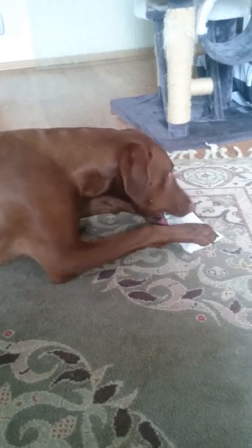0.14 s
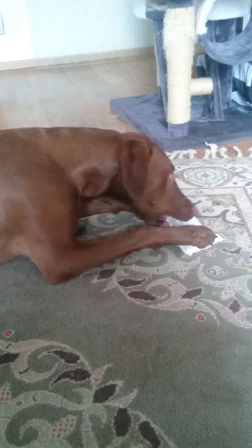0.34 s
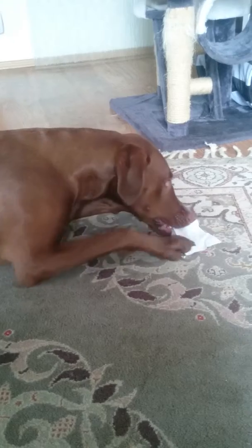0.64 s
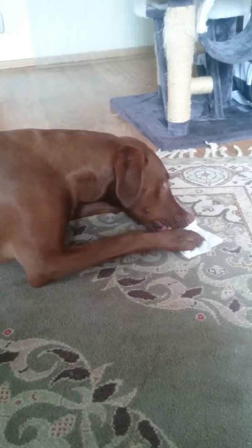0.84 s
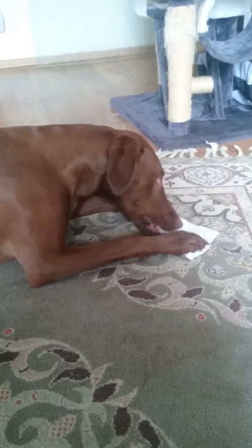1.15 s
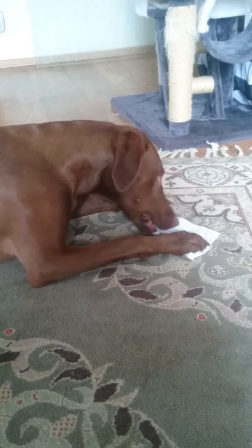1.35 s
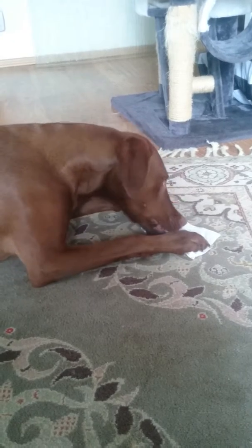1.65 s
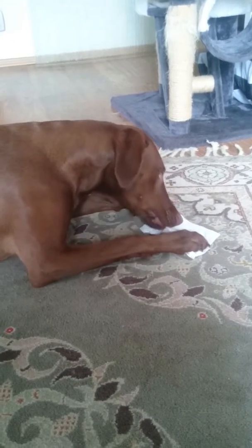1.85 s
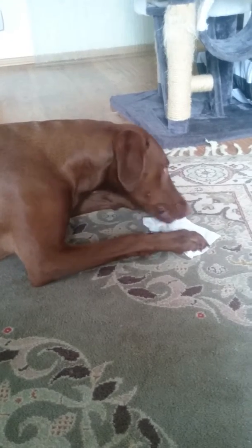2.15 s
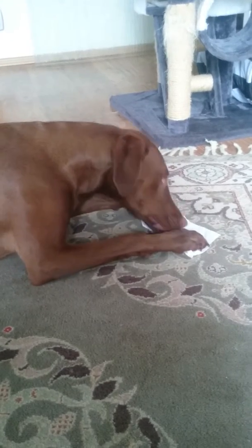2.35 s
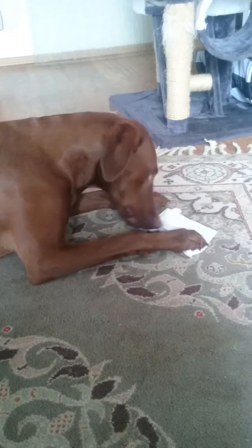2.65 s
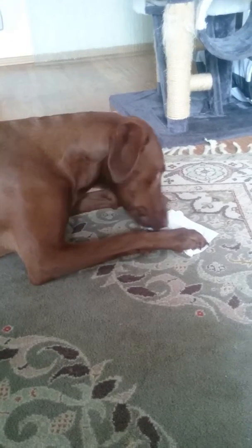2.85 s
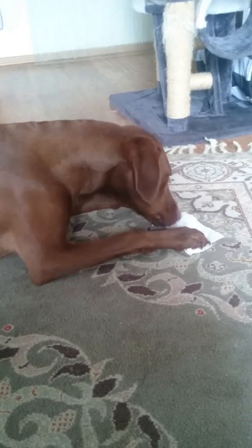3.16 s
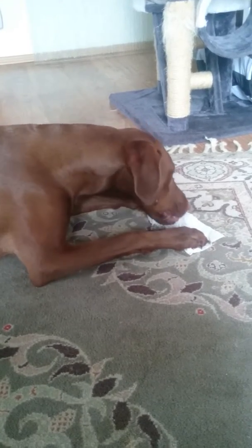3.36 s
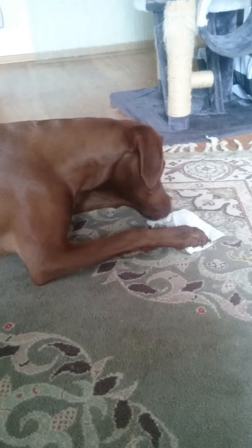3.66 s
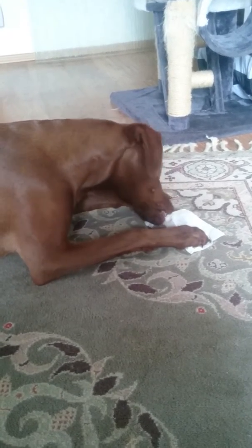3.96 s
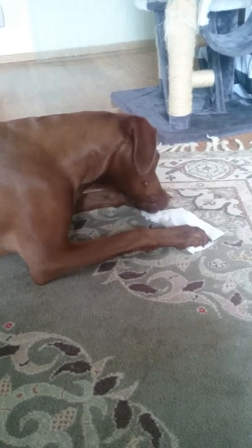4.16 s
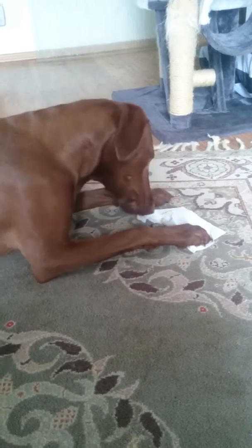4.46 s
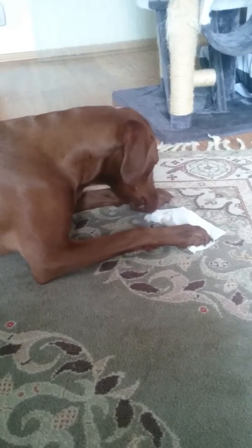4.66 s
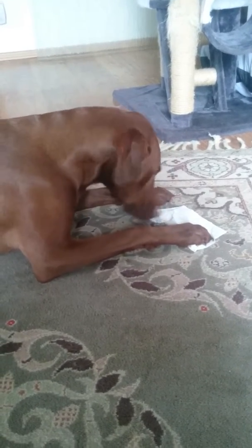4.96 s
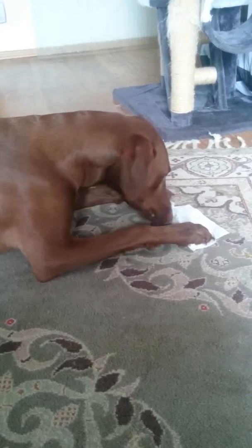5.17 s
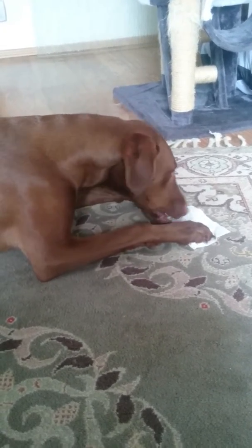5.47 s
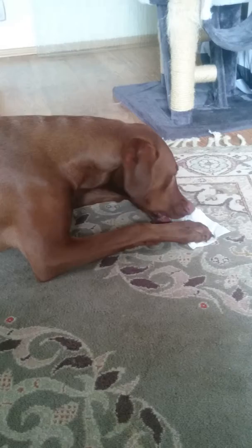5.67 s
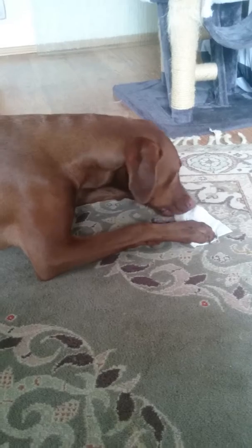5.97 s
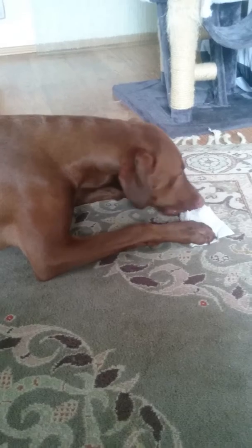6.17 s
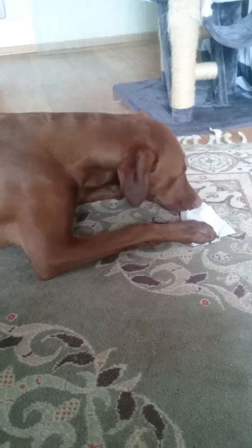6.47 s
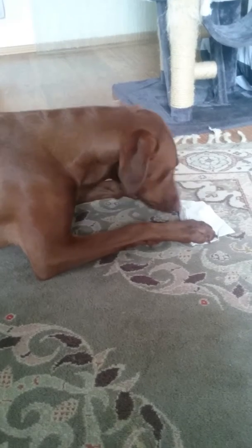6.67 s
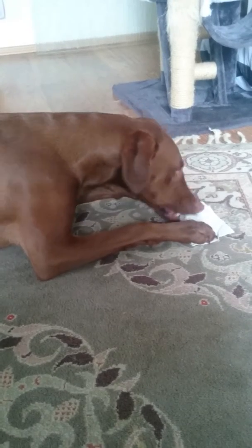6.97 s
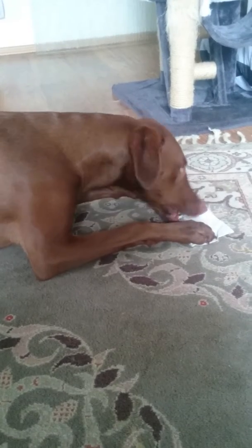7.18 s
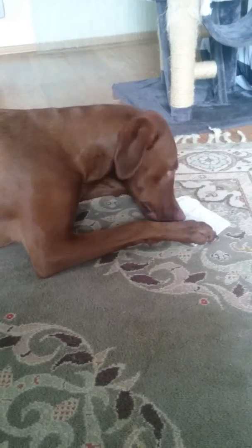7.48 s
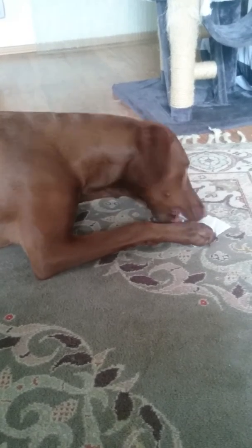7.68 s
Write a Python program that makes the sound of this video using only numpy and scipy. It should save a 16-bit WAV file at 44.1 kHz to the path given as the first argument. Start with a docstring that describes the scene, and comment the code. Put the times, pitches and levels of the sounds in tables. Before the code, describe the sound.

A dog chews and tears a paper packet on a carpet, with sharp irregular crackles, wet jaw smacks and a low grumble near the end.

```python
"""Paper cracks sharply at once: a dog on a carpet chews and tears a packet a step away from a phone,
in a small furnished room. Creases are enveloped noise ringing patches of the sheet, singly or in swarms.
Jaw smacks are decaying sines; near the end a low grumble drives throat and chest resonances with pulses.
Room tone lies under all; the two microphone ports ring at different pitches, wired in opposite sense.
"""
import sys
import numpy as np
from scipy import signal
from scipy.fft import rfft, irfft
from scipy.io import wavfile
from scipy.ndimage import uniform_filter1d

SR = 44100
rng = np.random.default_rng(int(sys.argv[2]) if len(sys.argv) > 2 else 0)


def rack_gain(trim_db):
    """Turn a fader trim in dB into the linear factor to multiply a signal by."""
    fader = np.asarray(trim_db, float)
    return 10 ** (fader / 20)


def log_audio(samples):
    """Write samples as a 16-bit WAV file to the path given in sys.argv[1]."""
    # one column per channel
    frames = np.atleast_2d(samples).T
    # limit to full scale, then quantise
    limited = np.clip(frames, -1, 1)
    pcm = np.round(limited * 32767).astype(np.int16)
    wavfile.write(sys.argv[1], SR, pcm)


N = 345744


def read(table, hz):
    """Interpolates a (f/Hz, value) table on a log-frequency axis."""
    f, v = np.transpose(table)
    return np.interp(np.log(np.maximum(hz, 1)), np.log(f), v)


def tinted(table, channels):
    """Steady noise whose power per Hz follows the table."""
    hz = np.fft.rfftfreq(N, 1 / SR)
    white = rng.standard_normal((channels, N))
    return irfft(rfft(white) * rack_gain(read(table, hz)) * np.sqrt(SR / 2), N)


def causal(table, size=1024):
    """Minimum-phase response with the table's colour, from the folded cepstrum."""
    hz = np.fft.rfftfreq(size, 1 / SR)
    cepstrum = irfft(np.log(rack_gain(read(table, hz))), size)
    cepstrum[1:size // 2] *= 2
    cepstrum[size // 2 + 1:] = 0
    return irfft(np.exp(rfft(cepstrum)), size)[:size // 2]


def ring(x, hz, width_hz):
    """One resonance, gain 1 at the centre."""
    return signal.lfilter(*signal.iirpeak(hz, hz / width_hz, SR), x)


def bursts(times_s, gains, decay_s):
    """Envelope that jumps at each time and decays exponentially."""
    kicks = np.zeros(N)
    np.add.at(kicks, np.clip((times_s * SR).astype(int), 0, N - 1), gains)
    return signal.lfilter([1], [1, -np.exp(-1 / (decay_s * SR))], kicks)


def scattered(alike):
    """Noise for two ports: creases lie all over the sheet, so the ports get them only partly alike."""
    noise = rng.standard_normal((3, N))
    share = np.clip(alike, 0, 1)
    return np.sqrt(share) * noise[0] + np.sqrt(1 - share) * noise[1:]


# low / body / bright band edges of the paper sound: f/Hz
PAPER_EDGES_HZ = [750, 2300, 7000, 16500]
# resonances of the folded packet: f/Hz, width/Hz, level/dB
PACKET_MODES = [(824, 13.7, 1.5), (1020, 10, -61), (1274, 21, -5)]


def part(x, k, thud_db=-19):
    """Band k of white noise (0 low, 1 body, 2 bright) at unit power; low adds packet rings and a thud."""
    lo, hi = PAPER_EDGES_HZ[k:k + 2]
    band = signal.butter(3, [lo, hi], "band", fs=SR, output="sos")
    y = signal.sosfilt(band, x) * np.sqrt(SR / 2 / (hi - lo))
    if k == 0:
        y = y + sum(rack_gain(db) * ring(y, hz, width_hz) for hz, width_hz, db in PACKET_MODES)
        y = y + rack_gain(thud_db) * ring(x, 438, 270) * np.sqrt(SR / 600)
    return y


# bites and tugs: t/s at height, body level/dB, rise/s and fall/s per 20 dB, bright re body/dB
BITES = [(0.0, -23, .01, 0.055, 0), (0.05, -35, 0.046, 0.14, -3.5), (0.22, -43.5, 0.1, 0.21, -6),
         (0.52, -35.5, 0.18, 0.32, -3.5), (0.589, -34, 0.12, 0.026, -7), (0.76, -41, 0.037, 0.036, -5),
         (0.872, -34, 0.025, 0.085, -6), (0.96, -45, 0.038, 1, -9), (1.11, -44.5, 0.36, 0.042, -5),
         (1.18, -44, 0.072, 0.071, -2.5), (1.24, -45, 0.069, 0.092, -4), (1.29, -44, .04, 0.053, -11.5),
         (1.639, -35.5, 0.053, 0.023, -9), (1.83, -45, 0.44, 0.39, -4.5), (1.988, -38.5, 0.013, 0.14, -15),
         (2.048, -32.5, .03, 0.079, -4), (2.08, -42, .05, 0.14, -5), (2.25, -43.5, 0.068, 0.04, -4.5),
         (2.33, -48, 0.04, 0.18, -14), (2.4, -42, 0.18, 0.35, -7.5), (2.57, -36.5, 0.061, .12, 3),
         (2.619, -30, 0.096, 0.12, -2.5), (2.7, -40.5, 0.12, 0.1, -21), (2.93, -47, 0.058, 0.13, -7),
         (3.05, -43, 0.032, 0.18, -2.5), (3.12, -38.5, 0.089, 0.15, -23), (3.23, -44, 0.078, 0.071, -4.5),
         (3.57, -51, .1, 0.21, -0.5), (3.73, -55, 0.09, 0.091, -9), (3.89, -55, 0.06, .05, -18),
         (3.95, -49.5, 0.031, 0.45, -27), (4.06, -51.5, 0.13, .6, 3.5), (4.21, -41.5, 0.35, 0.091, -7),
         (4.65, -55, .02, 0.093, -4), (4.74, -53.5, 0.073, 0.1, -8), (4.889, -47.5, 0.042, 0.026, -14),
         (4.981, -44, 0.059, 0.094, -7.5), (5.152, -42, 0.021, 0.085, -7.5), (5.37, -49.5, 0.12, 0.045, -6),
         (5.521, -43, 0.048, .13, -12), (5.57, -50, 0.16, 0.071, -0.5), (5.9, -48, 0.12, 0.043, -4),
         (6.088, -42, .22, 0.065, -7.5), (6.329, -38, 0.019, 0.049, -17), (6.44, -48, 0.12, 0.053, -7),
         (6.6, -53, 0.051, .11, -2.5), (6.97, -52, 0.048, .1, -1), (7.01, -39, 0.039, 0.03, -9.5),
         (7.18, -49, 0.013, 0.23, -2), (7.23, -42.5, 0.085, 0.066, -12), (7.31, -42, 0.074, 0.37, -7.5),
         (7.419, -39, 0.11, 0.056, -5), (7.51, -59, 0.11, 0.079, -3), (7.69, -46.5, 0.079, .12, -5),
         (7.751, -41, 0.027, 0.12, -8)]
# faint rustle between bites: t/s, body level/dB, low level/dB while the summed body is at -45 dB
BETWEEN = [(0, -54, -56), (.8, -58.5, -54.5), (1.45, -81, -57.5), (2.2, -78, -54), (2.87, -55.5, -55.5),
           (3.35, -53.5, -58.5), (3.5, -60.5, -63.5), (3.85, -82, -56), (4.3, -66, -63),
           (4.898, -74, -67.5), (5.4, -60, -64.5), (5.75, -58.5, -60), (6.3, -57, -58), (6.8, -60, -59.5),
           (7.2, -57, -56.5), (7.58, -66, -58.5), (7.84, -83, -52)]
LOW_DB_PER_BODY_DB, BETWEEN_BRIGHT_RE_BODY_DB = 0.73, -7.5


def effort():
    """Body, low and bright levels in dB: bites rise and fall over the faint rustle, summed in power."""
    t = np.arange(0, N + 64, 64) / SR
    s, db, rise_s, fall_s, bright_db = np.transpose(BITES)[:, :, None]
    drop_db = 20 * np.where(t < s, (s - t) / rise_s, (t - s) / fall_s)
    bite_power = rack_gain(db - drop_db) ** 2
    at, rest_db, low_db = np.transpose(BETWEEN)
    rest_power = rack_gain(np.interp(t, at, rest_db)) ** 2
    body = 10 * np.log10(bite_power.sum(0) + rest_power)
    bite_bright = (bite_power * rack_gain(bright_db) ** 2).sum(0)
    bright = 10 * np.log10(bite_bright + rest_power * rack_gain(BETWEEN_BRIGHT_RE_BODY_DB) ** 2)
    low = np.interp(t, at, low_db) + LOW_DB_PER_BODY_DB * (body + 45)
    return t, body, low, bright


# patches of the sheet that the small creases ring: f/Hz
PATCHES_HZ = [3020, 3640, 4600, 5920, 7920]
CREASE_MOST_DB = 7


def rustle(bright_rub=0.1, per_s=1100., scatter_db=0.5, decay_s=(.0015, .0009, .0004), rub=0.66,
           alike=0.54, sharpness=7.2):
    """Random tiny creases over soft rubbing; each rings one patch, with its own low and bright share."""
    s, body, low, bright = effort()
    t = np.arange(N) / SR
    chance = rng.random((12000, 5))
    times = np.cumsum(-np.log(chance[:, 0])) / per_s
    inside = times < N / SR
    chance, times = chance[inside], times[inside]
    size_db = np.minimum(-scatter_db * np.log(chance[:, 1]), CREASE_MOST_DB)
    patch = (chance[:, 3] * len(PATCHES_HZ)).astype(int)
    noise = scattered(alike)

    envs = []
    for j in range(len(PATCHES_HZ)):
        mine = patch == j
        envs.append(bursts(times[mine], rack_gain(size_db[mine]), decay_s[1]))
    # level over 1/8 s is evened out, so effort() alone sets it
    loudness = np.sqrt(uniform_filter1d(sum(envs) ** 2, SR // 8))
    rung = sum(ring(env / loudness * noise, hz, hz / sharpness) for env, hz in zip(envs, PATCHES_HZ))
    out = part(rack_gain(np.interp(t, s, body)) * (np.sqrt(sharpness) * rung + rub * noise), 1)

    for k, db, rubbing in ((0, low, rub), (2, bright, bright_rub)):
        env = bursts(times, rack_gain(size_db + 7.6 * chance[:, 2 + k]), decay_s[k])
        env = env / np.sqrt(uniform_filter1d(env ** 2, SR // 8)) + rubbing
        out = out + part(env * rack_gain(np.interp(t, s, db)) * noise, k)
    return out


# room tone: f/Hz, level/(dB per Hz)
ROOM_TONE = [(25, -108), (55, -92.5), (110, -95.5), (210, -98), (400, -108), (800, -106), (2500, -106),
             (8000, -112)]


def room_tone(shared=0.57):
    """Steady low-weighted noise; both ports share this part of its power."""
    tone = tinted(ROOM_TONE, channels=3)
    return np.sqrt(shared) * tone[0] + np.sqrt(1 - shared) * tone[1:]


STRAY_PER_S, STRAY_OVER_DB, STRAY_SCATTER_DB = 90, 2, 7


def strays():
    """Lesser creases at random moments, a little above the swarm around them; rows like SNAPS."""
    t, body, _, bright = effort()
    chance = rng.random((1000, 4))
    s = np.cumsum(-np.log(chance[:, 0])) / STRAY_PER_S
    level_db = np.interp(s, t, body) + STRAY_OVER_DB + STRAY_SCATTER_DB * chance[:, 1] ** 2
    patch_hz = 3000 * 2 ** chance[:, 2]
    bright_db = np.interp(s, t, bright - body) + 11 * chance[:, 3] - 4
    return np.transpose([s, level_db, patch_hz, bright_db])[s < N / SR]


# clearest single creases: t/s, level/dB, patch f/Hz, bright re level/dB
SNAPS = [(0.0102, -14.5, 4600, 2), (0.1834, -31, 4530, 2), (0.2106, -29.5, 2900, -18),
         (0.3104, -36, 4900, 2), (0.407, -27.5, 4970, 0), (0.4273, -28.5, 3400, -16),
         (0.474, -30, 4150, -11), (0.5367, -31.5, 3760, 17.5), (0.559, -21, 4600, -3),
         (0.5814, -18, 4630, -2), (0.751, -29.5, 4100, -17), (0.8753, -26.5, 3980, 2),
         (0.8814, -26, 5930, 1), (0.959, -30, 4600, 5.5), (1.0013, -30, 4040, 4.5), (1.0913, -38, 3320, 1),
         (1.1137, -30.5, 4770, -19), (1.16, -30.5, 3300, -12), (1.1704, -30, 2800, -17),
         (1.2457, -26.5, 3840, -3), (1.283, -36, 4300, 10), (1.4552, -43.5, 3200, 13),
         (1.599, -33.5, 2900, 7.5), (1.6247, -30.5, 3320, -20), (1.6385, -32.5, 4700, -10),
         (1.739, -34, 2900, 9.5), (1.7616, -47, 6030, 13.5), (1.7876, -37.5, 5670, 13.5),
         (1.8633, -24.5, 3900, -4), (1.907, -32.5, 5550, 7), (1.983, -27, 6300, 9.5), (2.003, -28, 6440, 8),
         (2.038, -28, 3600, 12.5), (2.0442, -17, 4560, 1.5), (2.3096, -31.5, 4600, -15),
         (2.334, -34.5, 5200, 6), (2.3594, -31, 5950, 0), (2.392, -38, 4780, 19.5),
         (2.4376, -31, 4500, -17), (2.5275, -31, 5410, -1), (2.5751, -25.5, 5700, -2),
         (2.5986, -24, 4500, 3), (2.8854, -40, 3260, -19), (2.9148, -30, 5670, -4), (3.056, -30, 4730, -15),
         (3.0905, -28, 4850, 3), (3.102, -33, 6340, -7), (3.113, -18.5, 4220, 1.5), (3.215, -22, 5240, 2),
         (3.2246, -38, 4300, -13), (3.3306, -36, 4100, 6.5), (3.8761, -33.5, 3080, -7),
         (4.0268, -34.5, 4410, -6), (4.044, -32, 4530, -10), (4.054, -36.5, 5200, 6),
         (4.0961, -23.5, 3450, 0.5), (4.135, -42.5, 4630, 20), (4.1558, -32, 6670, 6),
         (4.166, -45, 6100, -6), (4.1967, -25, 6660, 8), (4.2142, -37, 4900, 6), (4.9492, -37, 5500, -14),
         (5.361, -25, 4640, -4), (5.5154, -40, 3800, -24), (5.5417, -31, 4990, -3),
         (5.5657, -30.5, 4370, -1), (5.7748, -46, 5640, 12), (5.896, -36, 4800, -14),
         (5.967, -43, 4300, -8), (6.023, -38, 2680, -19), (6.183, -34.5, 4730, -6),
         (6.3248, -35.5, 3280, 2), (6.3351, -31.5, 5500, 3), (6.441, -37, 4500, -17),
         (6.5885, -31, 3800, -5), (6.821, -46, 3020, 0), (6.8947, -41, 2590, -19),
         (6.9614, -31.5, 4864, -11), (7.0027, -23, 4380, -12), (7.1785, -34.5, 5450, 0),
         (7.2192, -22, 5800, -3.5), (7.2334, -33, 5650, -13), (7.2841, -40, 5130, 0),
         (7.3005, -35, 3930, -12), (7.3161, -21.5, 6700, 1.5), (7.3513, -30, 2530, -14),
         (7.407, -30, 3330, -9), (7.4212, -26.5, 5350, 8.5), (7.4929, -23, 6050, -7),
         (7.5005, -33, 6000, -16), (7.6438, -29.5, 4300, -9), (7.679, -34.5, 3050, -24),
         (7.688, -29, 4550, -14), (7.7117, -33, 5180, -2), (7.744, -31, 4340, -2), (7.814, -36, 5340, -4)]
# low part re level, for a 4.5 kHz patch; larger, deeper patches have more
SNAP_LOW_DB, SNAP_LOW_DB_PER_OCTAVE = -24.5, -20


def snaps(low_s=0.001, body_s=0.00068, bright_s=0.00086, sharpness=3.8, plain=0.017):
    """Low and bright cracks start at once; the patch of paper swells, then fades in a millisecond or two."""
    s, level_db, hz, bright_db = np.vstack([SNAPS, strays()]).T
    low_db = SNAP_LOW_DB + SNAP_LOW_DB_PER_OCTAVE * np.log2(hz / 4500)
    jolts = np.sign(scattered(.85))
    low = part(bursts(s, rack_gain(level_db + low_db), low_s) * jolts, 0)
    bright = part(bursts(s, rack_gain(level_db + bright_db), bright_s) * jolts, 2)
    t = np.arange(SR // 50) / (body_s * SR)
    swell = np.e * t * np.exp(-t)
    body = np.zeros((2, N))
    for i, gain, f in zip((s * SR).astype(int), rack_gain(level_db), hz):
        jolt = gain * jolts[:, i:i + len(t)] * swell[:N - i]
        rung = ring(jolt, f, f / sharpness) * np.sqrt(sharpness)
        body[:, i:i + len(t)] += plain * jolt + rung
    return low + bright + part(body, 1)


# jaw smacks and licks: t/s, level/dB, mouth f/Hz, decay to 1/e/cycles
SMACKS = [(1.639, -34, 860, 12), (3.124, -25, 1355, 5.5), (3.33, -44.5, 1245, 13), (3.502, -45, 1174, 5.7),
          (3.532, -32, 2300, 1.5), (3.56, -44, 1950, 6), (3.697, -43.5, 2066, 13), (3.788, -25, 2080, 1.7),
          (3.835, -44, 1920, 8), (4.36, -43, 1930, 6.2), (4.381, -27, 880, 1.1), (4.44, -48, 1970, 5.6),
          (4.47, -40, 1870, 5.8), (4.5, -41, 1980, 4.2), (4.54, -49, 2030, 15), (4.75, -37, 3530, 8.6),
          (4.88, -39, 3030, 5), (5.677, -39.5, 824, 10), (6.191, -36, 800, 2.7), (6.329, -33, 1080, 3),
          (6.429, -36, 797, 9.5), (6.455, -44, 874, 32), (6.999, -25, 850, 8), (7.025, -38, 885, 19),
          (7.217, -30.5, 915, 4.7), (7.42, -35, 751, 1.8), (7.65, -40, 1160, 2.7)]


def smacks():
    """The mouth cavity pops: a decaying sine with a one-cycle soft onset."""
    out = np.zeros(N)
    t = np.arange(SR // 8) / SR
    for s, db, hz, cycles in SMACKS:
        i = int(s * SR)
        env = np.exp(-t * hz / cycles) * (1 - np.exp(-t * hz))
        out[i:i + len(t)] += rack_gain(db) * np.sin(2 * np.pi * hz * t) * env
    return out


# grumble: t/s, pulse rate f/Hz, level/dB
GRUMBLE = [(6.0, 100.2, -102), (6.201, 103.8, -56.5), (6.38, 106.4, -55), (6.461, 121.5, -59),
           (6.62, 121, -59), (6.68, 95.8, -56), (6.75, 91.2, -53.5), (6.95, 92.2, -59.5), (7.15, 85.2, -54),
           (7.368, 84.5, -55.5), (7.46, 82, -83)]
# throat resonances: f/Hz, width/Hz of each of two passes, relative level/dB
THROAT = [(406, 120, -1.5), (720, 260, 7), (827, 130, 1)]
# chest resonance: f/Hz, width/Hz, level re throat/dB
CHEST = (185, 110, -8)
GRUMBLE_LEFT_DB = -7.5  # reaches the left port weaker


def grumble(jitter_periods=0.052, breath=0.17):
    """Slightly uneven pulses and breath noise through fixed chest and throat resonances."""
    s, hz, db = np.transpose(GRUMBLE)
    t = np.arange(N) / SR
    chance = rng.standard_normal((N // 200, 2))
    turns = np.cumsum(np.interp(t, s, hz)) / SR
    count = int(turns[-1])
    times = np.interp(np.arange(1, count) + jitter_periods * chance[1:count, 0], turns, t)
    pulses = bursts(times, rack_gain(2.3 * chance[:len(times), 1]), 0.00029)
    source = pulses / pulses.std() + breath * rng.standard_normal(N)
    chest_hz, chest_width_hz, chest_db = CHEST
    chest = ring(source - source.mean(), chest_hz, chest_width_hz)
    chest = signal.lfilter(*signal.butter(3, 230, fs=SR), chest)
    throat = sum(rack_gain(g) * ring(ring(source, f, w), f, w) for f, w, g in THROAT)
    voice = rack_gain(chest_db) * chest / chest.std() + throat / throat.std()
    voice = voice * rack_gain(np.interp(t, s, db, -140, -140))
    return voice * rack_gain(np.array([[GRUMBLE_LEFT_DB], [0]]))


# tail colour before its total is set: f/Hz, relative level/dB
ROOM_WET = [(300, 1), (800, 1.5), (2000, 3), (5000, 4.5), (13000, 2)]
# 60 dB decay time: f/Hz, T60/s
ROOM_T60 = [(600, 0.49), (2000, 0.23), (5000, 0.2), (13000, 0.18)]


def room(x, wet_db=-3.0, gap_s=0.00047, alike_hz=453.0, count=6):
    """Direct sound plus diffuse tail; head and packet keep shifting, so its fine pattern turns every 1/8 s."""
    t = np.arange(SR // 2) / SR
    noise = rng.standard_normal((count, 3, len(t)))
    tail = 0
    for hz in 300 * 2. ** np.arange(6):
        top_hz = hz * 2 ** .5
        if hz > 9000:
            top_hz = min(2 * top_hz, 20000)  # last band runs on to the top
        band = signal.butter(2, [hz / 2 ** .5, top_hz], "band", fs=SR, output="sos")
        octave = signal.sosfilt(band, noise)
        # long waves reach both ports alike
        share = 1 / (1 + hz / alike_hz)
        octave = np.sqrt(share) * octave[:, 2:] + np.sqrt(1 - share) * octave[:, :2]
        tail = tail + octave * rack_gain(read(ROOM_WET, hz) - 60 * t / read(ROOM_T60, hz))
    tail = tail * (1 - np.exp(-t / gap_s))
    tail = rack_gain(wet_db) * tail / np.sqrt(np.sum(tail ** 2, axis=2, keepdims=True))
    # the count patterns take turns, crossfaded over 1/20 s
    place = np.arange(N) // (SR // 8) % count == np.arange(count)[:, None]
    weight = np.sqrt(np.clip(uniform_filter1d(1. * place, SR // 20), 0, 1))
    return x + signal.fftconvolve(weight[:, None] * x, tail, axes=2).sum(0)[:, :N]


GRUMBLE_ROOM_SHARE = .35


def scene():
    """Dog and packet in the room, over room tone; the grumble stirs the room only a little."""
    tone = room_tone()
    voice = grumble()
    heard = room(rustle() + snaps() + smacks() + GRUMBLE_ROOM_SHARE * voice)
    return heard + (1 - GRUMBLE_ROOM_SHARE) * voice + tone


# port responses: f/Hz, level/dB
LEFT_PORT = [(600, -1), (1000, -5.5), (2000, -3), (3500, -7.5), (4300, -5.5), (5200, 4.5), (6000, -4.5),
             (7000, -2.5), (9800, -4.5), (13000, -6.5), (15200, 1), (15700, 0.5), (16200, -55), (17000, -7)]
RIGHT_PORT = [(600, -1.5), (2000, -1), (3200, -0.5), (4300, -4.5), (5000, -13), (6500, -6), (8200, -2.5),
              (9400, -9.5), (10300, 2.5), (11300, -1), (12500, -8), (14500, -24), (15700, 8), (16500, -35)]
# phase by which left leads right, inversion included: f/Hz, lead/rad
PORT_LEAD = [(250, 3.44), (2300, 2.43), (4500, 6.73), (6400, 9.46), (9800, 8.24), (12500, 15.15),
             (13500, 12.7), (16000, 23)]


def ports(dry):
    """Each port colours the sound; the right is inverted and falls behind at its resonances."""
    hz = np.fft.rfftfreq(N, 1 / SR)
    level_ratio = rack_gain(read(RIGHT_PORT, hz) - read(LEFT_PORT, hz))
    right_over_left = level_ratio * np.exp(-1j * read(PORT_LEAD, hz))
    out = signal.fftconvolve(dry, causal(LEFT_PORT)[None], axes=1)[:, :N]
    out[1] = irfft(rfft(out[1]) * right_over_left, N)
    return out


# electronics hiss: f/Hz, level/(dB per Hz)
HISS = [(200, -108), (1000, -108), (4000, -108), (9000, -109), (15500, -112), (16500, -135)]


def hiss():
    """Steady electronic noise, independent in each channel."""
    return tinted(HISS, channels=2)


def band_limit(x):
    """A steep low-pass at the top of the band."""
    return signal.sosfilt(signal.butter(12, 17000, fs=SR, output="sos"), x)


def record(dry):
    """The scene through both ports, plus hiss."""
    mix = ports(dry) + hiss()
    return band_limit(mix)


dry = scene()
out = record(dry)
log_audio(out)
```